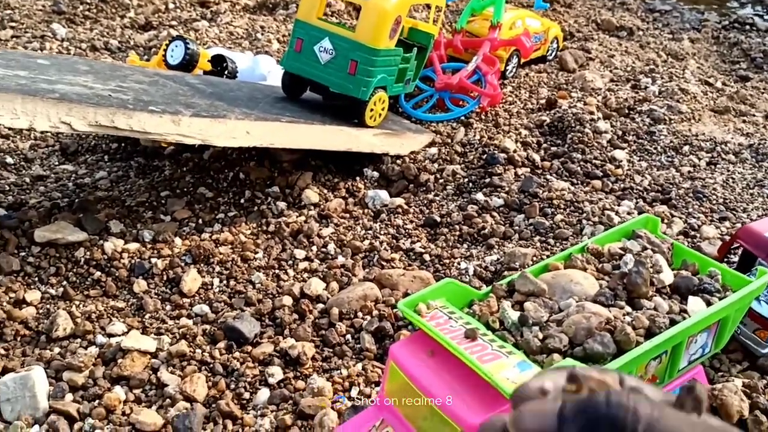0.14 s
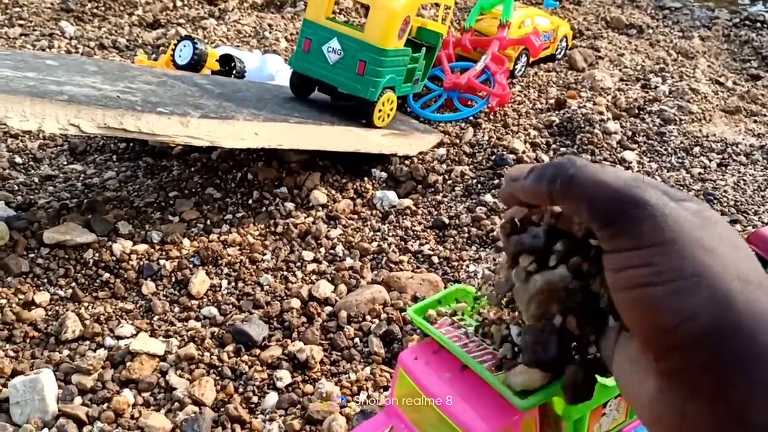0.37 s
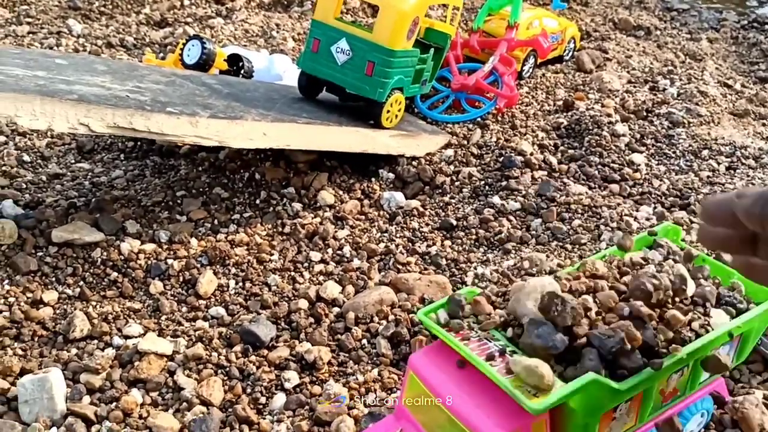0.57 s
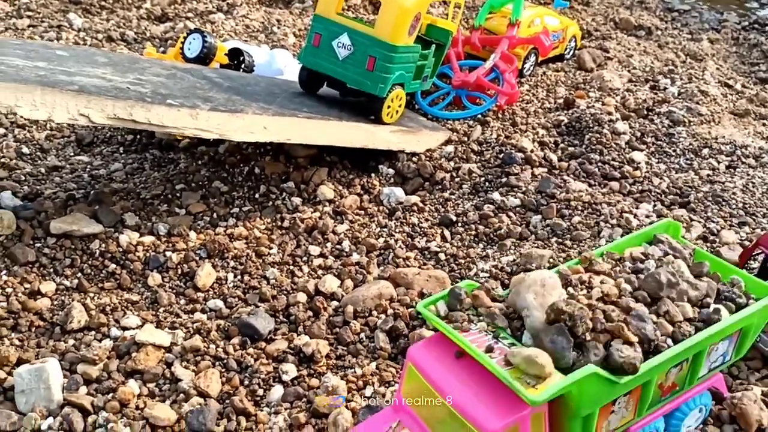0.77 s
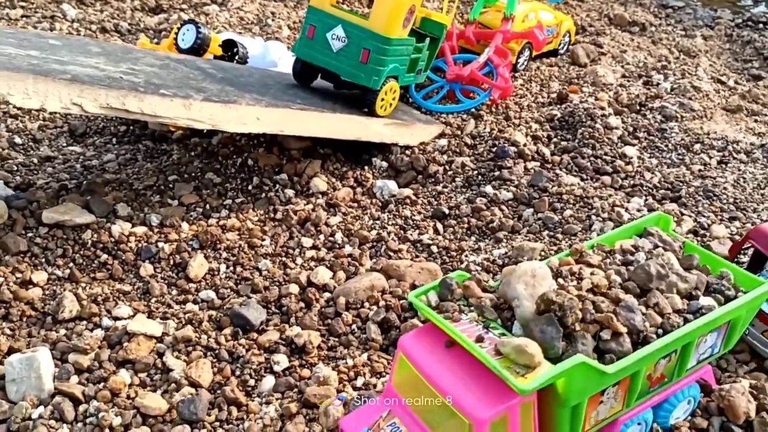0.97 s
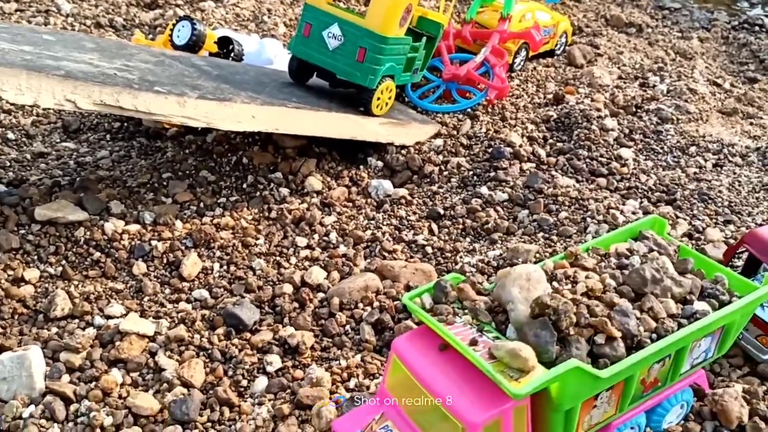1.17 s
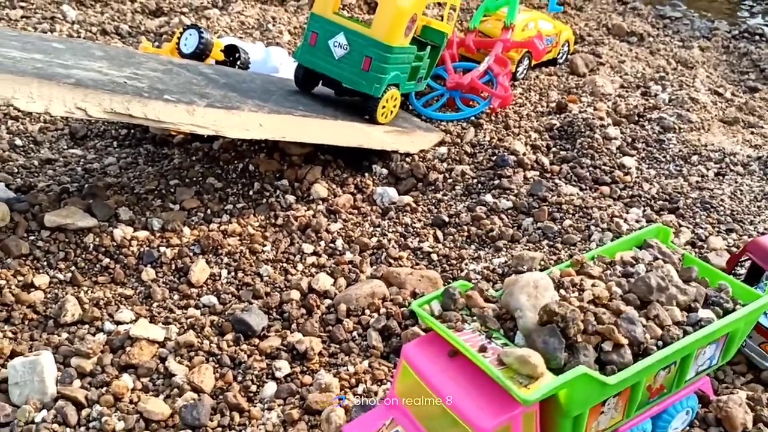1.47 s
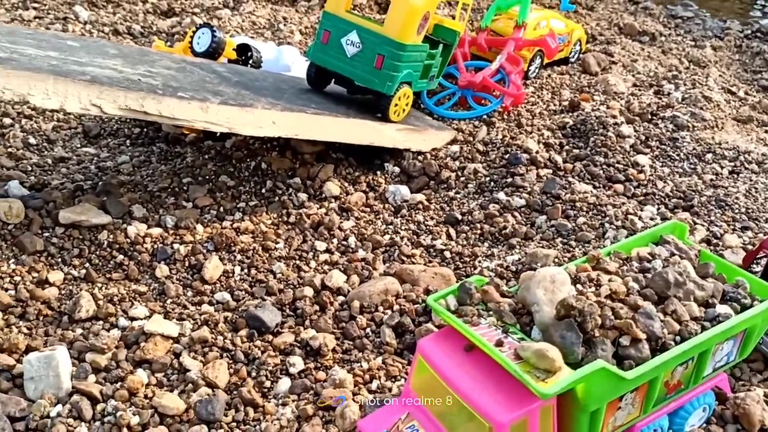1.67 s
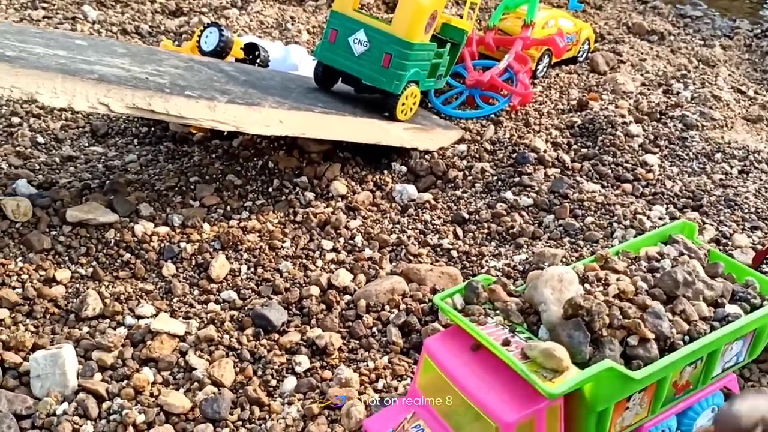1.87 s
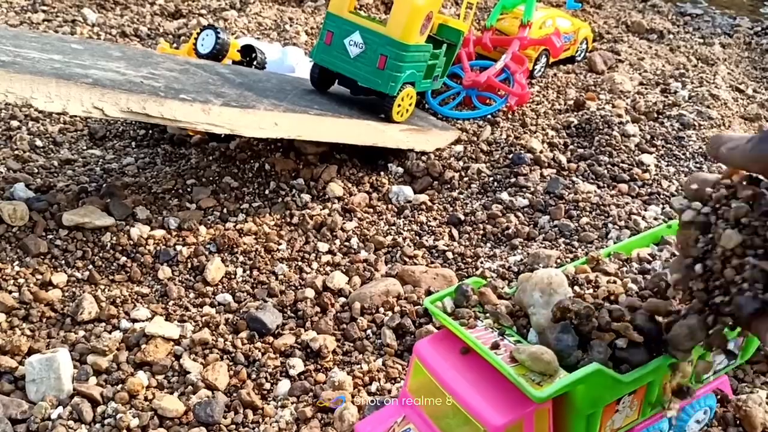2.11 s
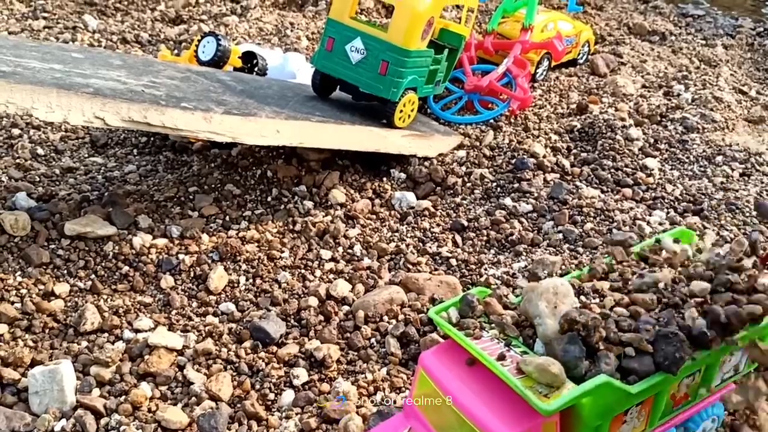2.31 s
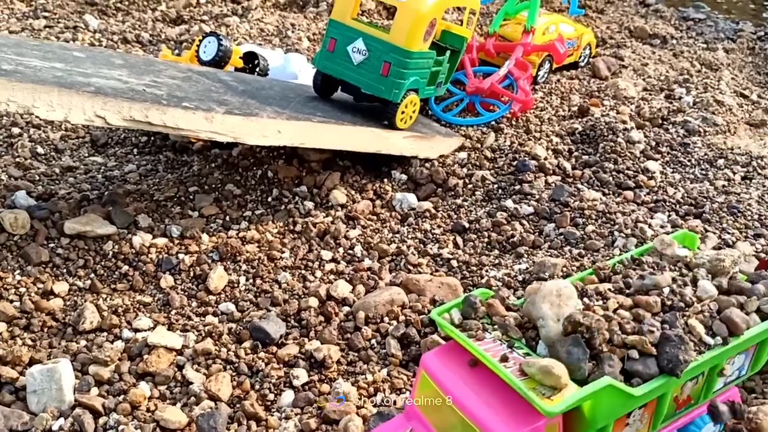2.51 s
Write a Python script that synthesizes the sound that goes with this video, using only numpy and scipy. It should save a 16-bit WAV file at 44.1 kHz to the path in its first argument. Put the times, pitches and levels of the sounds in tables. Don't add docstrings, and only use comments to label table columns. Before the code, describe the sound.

Gravel pours into a plastic toy truck bed, close and dry outdoors. Light grit and stone clicks build from 0 s; a dense, bright clatter with hollow knocks peaks around 0.3-0.6 s and thins by 0.85 s. From 0.9 to 1.6 s, softer gritty scraping and sparse ticks. A second handful rattles in from 2.0 to 2.45 s, then last stones settle. Faint traffic hum throughout, mono.

```python
import sys
import numpy as np
from scipy import signal
from scipy.fft import rfft, irfft
from scipy.io import wavfile
from scipy.ndimage import uniform_filter1d, minimum_filter1d, map_coordinates

SR = 44100
rng = np.random.default_rng(int(sys.argv[2]) if len(sys.argv) > 2 else 0)


def log_audio(samples):
    frames = np.atleast_2d(samples).T
    limited = np.clip(frames, -1, 1)
    pcm = np.round(limited * 32767).astype(np.int16)
    wavfile.write(sys.argv[1], SR, pcm)


def gain_from_db(level_db):
    decades = np.asarray(level_db, float) / 20
    return 10 ** decades


N = 116865

# freq_hz, gain_db
STONE_SPECTRUM = [(350, -28), (1600, -9.5), (5500, -6), (7800, -2.5), (10200, -9.5), (13000, -5.5),
                  (15500, 0.24)]


def unit(x):
    return x / np.sqrt(np.mean(x ** 2) + 1e-20)


def along(points, freq_hz):
    point_hz, gain_db = np.transpose(points)
    return gain_from_db(np.interp(np.log(freq_hz + 1), np.log(point_hz + 1), gain_db))


def wobble(rate_hz):
    knots = rng.standard_normal(int(N * rate_hz / SR) + 4)
    return map_coordinates(knots, [np.arange(N) * rate_hz / SR])


def flow(column):
    # time_s, grit_patter_db, bed_shaking_db, sliding_sand_db
    flow_rows = np.array([(0, -42.5, -82, -47.5), (.22, -45.5, -75, -50.5), (.32, -39.5, -47, -44),
                          (0.419, -26.5, -32.5, -39), (0.558, -32.5, -36, -29.5), (.72, -38, -47, -84),
                          (.83, -50, -56, -58), (.93, -40.5, -92, -40), (1.2, -37, -58, -33),
                          (1.42, -50, -89, -40), (1.66, -49.5, -67, -48.5), (2.0, -46, -103, -62),
                          (2.12, -47.5, -60, -45.5), (2.23, -28, -42, -41), (2.431, -28, -36.5, -38.5),
                          (2.501, -41.5, -47, -48.5), (2.65, -42.5, -85, -76)])
    return np.interp(np.arange(N) / SR, flow_rows[:, 0], flow_rows[:, column])


def hiss(spectrum):
    freq_hz = np.fft.rfftfreq(N, 1 / SR)
    return unit(irfft(rfft(rng.standard_normal(N)) * along(spectrum, freq_hz), N))


def strike(rows, body, rise_s, t60_s, tail_db, tail_t60_s, q, broad_db, under, over, size):
    peak_s, peak_db, pitch_hz = np.transpose(rows)[:, :, None]
    t = np.arange(size) / SR
    freq_hz = np.fft.rfftfreq(2 * size, 1 / SR) + 1
    noise = rng.standard_normal((len(peak_s), size))
    life = np.exp(0.32 * noise[:, :1])
    flight_s = 3 * rise_s * np.exp(0.5 * noise[:, 1:2])
    rebound_db = -17 + 2.0 * noise[:, 2:3]

    def contact(late_s):
        decay = gain_from_db(-60 * np.maximum(late_s, 0) / (t60_s * life))
        return np.clip(late_s / rise_s + 1, 0, 1) ** 2 * decay

    burst = contact(t - rise_s)
    burst = burst + gain_from_db(rebound_db) * contact(t - rise_s - flight_s)
    burst = burst + gain_from_db(tail_db - 60 * t / tail_t60_s) * (t > rise_s)
    noise[:, round(rise_s * SR)] += 3.5

    ratio = freq_hz / pitch_hz
    ring = 1j * ratio / q / (1 - ratio * ratio + 1j * ratio / q)
    broad = gain_from_db(broad_db) * (1j * ratio / (1 + 1j * ratio)) ** under / (1 + 1j * ratio) ** over
    lead = size // 4
    excitation = np.pad(burst * noise, ((0, 0), (lead, 0)))
    hit = irfft(rfft(excitation, 2 * size) * (ring + broad) * along(body, freq_hz), axis=1)
    hit *= gain_from_db(peak_db) / abs(hit).max(1, keepdims=True)
    at = (peak_s - rise_s) * SR - lead + np.arange(2 * size)
    at = np.clip(at, 0, N).astype(int)
    return np.bincount(at.ravel(), hit.ravel(), N + 1)[:N]


def scatter(count, level_db, spread_db, pitch_hz, octaves):
    u = rng.random((count, 3))
    at = (u[:, 0] * (N - 1)).astype(int)
    size_db = np.minimum(-spread_db * np.log(1 - u[:, 1]), 2.2 * spread_db)
    heavier_db = level_db[at] - level_db.mean()
    shift_oct = octaves * (2 * u[:, 2] - 1) - 0.028 * heavier_db
    grain_hz = np.minimum(pitch_hz * 2 ** shift_oct, 0.35 * SR)
    return np.transpose([at / SR, level_db[at] + size_db, grain_hz])


def traffic():
    # freq_hz, gain_db
    traffic_spectrum = [(22, -37), (82, 2), (130, -4.5), (320, -10), (1500, -22.5), (2500, -61)]
    shaking_db = flow(column=2)
    ducking_db = 0.066 * (shaking_db - shaking_db.min())
    return gain_from_db(-55 - ducking_db + 0.8 * wobble(1.9)) * hiss(traffic_spectrum)


def grit():
    # freq_hz, gain_db
    sand_spectrum = [(90, -19), (160, -2.5), (2500, -8.5), (6000, -2.5), (7900, 2.5), (10000, -6.5),
                     (13000, 0.5), (15700, -6)]
    patter_db = flow(column=1) + 8.0 + 0.28 * wobble(45.16)
    grains = scatter(count=2000, level_db=patter_db, spread_db=3.5, pitch_hz=9160, octaves=1.33)
    patter = strike(grains, STONE_SPECTRUM, rise_s=0.0003, t60_s=0.005, tail_db=-12, tail_t60_s=0.047,
                    q=3, broad_db=-5.5, under=1.7, over=0.71, size=192)
    sand_db = flow(column=3) + 2.8 * wobble(32.5) + 2.2 * wobble(180)
    return patter + gain_from_db(sand_db) * hiss(sand_spectrum)


def stones():
    # peak_s, peak_db, pitch_hz
    stone_clicks = [(0.0362, -21.5, 6460), (0.042, -31, 14500), (0.0448, -14, 6240), (0.0869, -11.5, 14670),
                    (0.118, -13.5, 13120), (0.1225, -17, 14130), (0.1623, -19, 8500), (0.1819, -15, 14130),
                    (0.2009, -14.5, 14940), (0.2037, -19, 13500), (0.2343, -19, 5300), (0.2417, -12, 5300),
                    (0.2522, -9.5, 4070), (0.2673, -15.1, 4500), (0.2809, -25, 9040), (0.2956, 4, 7140),
                    (0.3026, -5, 8230), (0.3307, -3, 8600), (0.3339, -11, 9380), (0.3402, -13, 14940),
                    (0.3564, -10.5, 4800), (0.3714, -13, 2500), (0.3752, -5, 14130), (0.4057, 2, 8900),
                    (0.4097, -13, 6800),
                    (0.4276, -11.5, 3980), (0.431, -4, 14670), (0.448, -2.5, 2450), (0.4515, -6, 14400),
                  (0.4807, -7, 13870), (0.506, -9.5, 3200), (0.5095, -16, 3400), (0.5136, -5.5, 3550),
                  (0.5241, -6.1, 8230), (0.5518, -1.5, 5400), (0.5716, -8.5, 5670), (0.5804, -11, 6960),
                  (0.5876, -13.5, 5470), (0.598, -8, 8390), (0.6249, -10.5, 4770), (0.6375, -8.5, 7160),
                  (0.6607, -13.4, 4540), (0.6726, -7.5, 6600), (0.702, -23, 5170), (0.7156, -13, 4400),
                  (0.739, -15, 14670), (0.7537, -15, 13120), (0.762, -14.5, 14940), (0.7652, -6, 13200),
                  (0.7682, -16, 3750), (0.802, -12, 5670), (0.8161, -19, 14940), (0.827, -21, 14940),
                  (0.8596, -24.5, 6340), (0.8828, -15, 8800),
                    (0.9012, -16, 8550), (0.9146, -10, 7640), (0.9931, -7, 13870), (0.9969, -6.5, 13120),
             (1.0703, -13, 8440), (1.077, -13, 8700), (1.1488, -14, 8080), (1.39, -15.5, 13120),
             (1.3942, -20, 13360), (1.4746, -21.8, 14130), (1.5536, -21, 14940), (1.5806, -16, 14670),
             (1.5858, -17, 12400), (1.604, -11.8, 7460), (1.6315, -17, 10110), (1.6712, -11, 15000),
             (1.6994, -26, 8300), (1.7136, -21.9, 14940), (1.7507, -23, 8390), (1.7728, -19, 14130),
             (1.7837, -17, 10400), (1.808, -22.5, 13870), (1.838, -19, 14130), (1.8414, -14, 14400),
             (1.8771, -19, 14400), (1.8873, -18.1, 14130),
                    (1.9127, -21, 14400), (1.9568, -3.9, 7230), (1.9874, -18, 14400), (1.9989, -18, 13870),
                   (2.0284, -7, 4000), (2.058, -17, 6710), (2.0609, -5, 8390), (2.0708, -16, 13300),
                   (2.0745, -13.5, 3340), (2.0803, -10, 13120), (2.1025, -10, 4130), (2.1319, -9, 10300),
                   (2.1353, -4, 4560), (2.141, -8, 8550), (2.148, -1, 10000), (2.1517, -6.5, 3120),
                   (2.1567, -3, 7200), (2.1612, -1.5, 5030), (2.1788, -9, 13120), (2.1825, -21, 5670),
                   (2.1927, -6, 13870), (2.2022, -5.6, 7640), (2.209, -6, 3040), (2.2136, -5, 3270),
                   (2.218, -1, 3370), (2.2205, -2, 5100), (2.2276, -14, 10300), (2.2392, -2, 6340),
                   (2.242, -5, 5240), (2.2547, 0.5, 3980), (2.2598, -10.5, 4060),
                    (2.2886, -10, 4450), (2.295, -9, 6960), (2.318, -5.9, 3500), (2.3432, -6.5, 8800),
                (2.3513, -9, 3770), (2.3798, -5, 7250), (2.3948, -12, 8550), (2.405, -3.7, 4020),
                (2.419, -9.5, 2500), (2.4401, -9, 5200), (2.5157, -14, 5500), (2.5205, -7.5, 14130),
                (2.524, -13, 14940), (2.5273, -2.5, 14500), (2.5847, -14, 14670), (2.5993, -15.5, 7300),
                    (0.955, -19.5, 3060),
        (1.2781, -16, 7800),
        (2.2798, -6, 6030),
        (2.4693, -12.5, 4230),
    ]
    clicks = stone_clicks
    return strike(clicks, STONE_SPECTRUM, rise_s=0.0009, t60_s=0.009, tail_db=-19, tail_t60_s=0.023,
                  q=3, broad_db=-1.5, under=1.0, over=1.0, size=768)


def bed():
    # freq_hz, gain_db
    bed_spectrum = [(130, -42), (330, -10.5), (700, -6.5), (1000, -2.5), (2000, -6.5), (4000, -11.5)]
    # peak_s,
    # peak_db, pitch_hz
    bed_knocks = [(0.2538, -23.5, 1060), (0.2796, -26, 2100), (0.3024, -17, 1250), (0.334, -25.5, 1110),
                  (0.3502, -24, 2490), (0.357, -24.5, 2500), (0.371, -28, 2530), (0.3984, -30, 780),
                  (0.4072, -29, 1000), (0.4291, -24, 930), (0.4347, -17, 830), (0.4487, -8.5, 1000),
                  (0.4683, -20.5, 770), (0.481, -18.1, 1070), (0.5068, -11.5, 1000), (0.5157, -11, 870),
                  (0.5316, -26, 2100), (0.5547, -9.5, 1050), (0.5893, -26, 1030), (0.5983, -19.5, 880),
                  (0.6222, -40, 1150), (0.642, -24, 840), (0.6676, -31, 1610), (0.6925, -30.9, 2130),
                  (0.7172, -20, 990), (0.7322, -33.5, 870), (0.7686, -21.5, 1940), (0.7873, -28.5, 2370),
                  (0.909, -25, 1110), (0.9365, -32.5, 1170), (1.0025, -31, 870), (1.1639, -30, 455),
                  (1.2671, -27, 1960), (1.292, -24.5, 2200), (1.3382, -28.5, 1810),
                  (2.0293, -26.7, 880), (2.0611, -23, 2070), (2.1028, -33, 1960), (2.1473, -26, 2140),
                   (2.1608, -19, 2540), (2.21, -16, 1060), (2.2178, -13, 895), (2.224, -20, 2030),
                   (2.242, -20.5, 1350), (2.2563, -17.5, 1430), (2.2656, -21, 1050), (2.2835, -16.5, 980),
                   (2.288, -10, 944), (2.2956, -16.5, 960), (2.3095, -19, 1010), (2.3186, -12, 1480),
                   (2.3289, -20, 1030), (2.3401, -22, 1270), (2.3518, -17, 1020), (2.3803, -20, 910),
                   (2.4051, -19, 970), (2.4191, -13.5, 950), (2.4287, -22, 1350), (2.4413, -20.5, 980),
                   (2.5084, -32.5, 1590), (2.5284, -23, 1990), (2.6286, -24.5, 790),
                  (2.162, -28, 516),
    ]
    knocks = strike(bed_knocks, bed_spectrum, rise_s=0.0015, t60_s=0.009,
                    tail_db=-28, tail_t60_s=0.04, q=4, broad_db=-4.5, under=0.8, over=0.68, size=1024)
    shaking_db = flow(column=2) + 3.0 + 3.4 * wobble(29.02)
    bumps = scatter(count=500, level_db=shaking_db, spread_db=3.5, pitch_hz=2230, octaves=0.93)
    shaking = strike(bumps, bed_spectrum, rise_s=0.001, t60_s=0.018, tail_db=-20, tail_t60_s=0.033,
                     q=3, broad_db=-6, under=0.25, over=0.65, size=512)
    return knocks + shaking


def scene():
    return np.tile(traffic() + grit() + stones() + bed(), (2, 1))


def top_cut(x):
    return signal.sosfilt(signal.butter(12, 17140, fs=SR, output="sos"), x)


def record(dry):
    needed = np.minimum(1, 0.8 / (abs(dry) + 1e-9))
    lowest = minimum_filter1d(needed, size=96, axis=1)
    held = dry * uniform_filter1d(lowest, size=48, axis=1)
    passed = np.fft.rfftfreq(N, 1 / SR) < 15850
    mix = irfft(rfft(held) * passed, N)
    return top_cut(mix)


dry = scene()
out = record(dry)
log_audio(out)
```